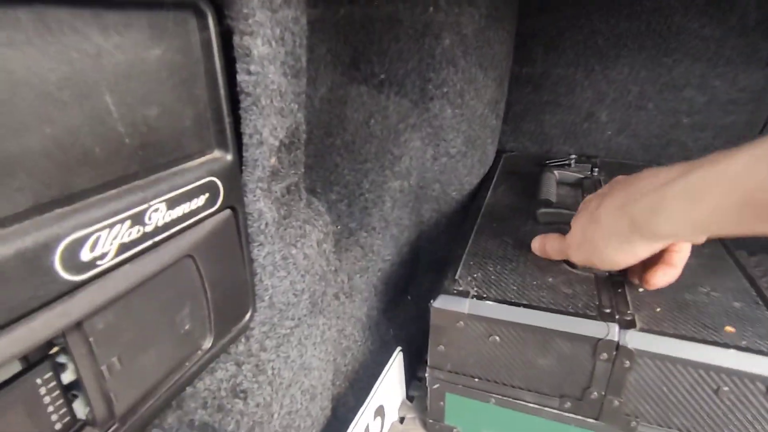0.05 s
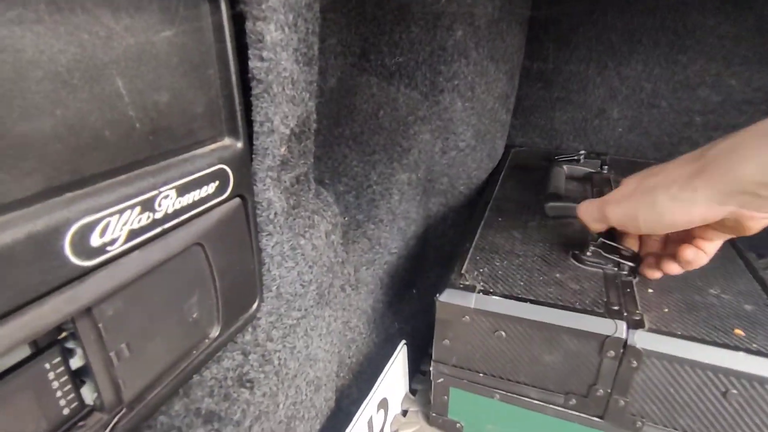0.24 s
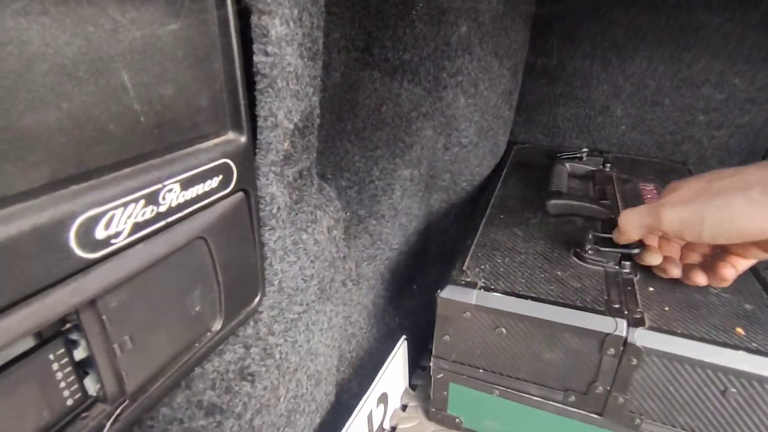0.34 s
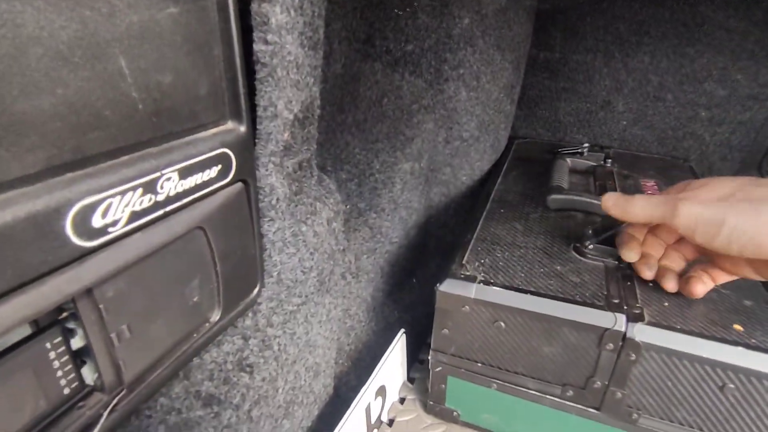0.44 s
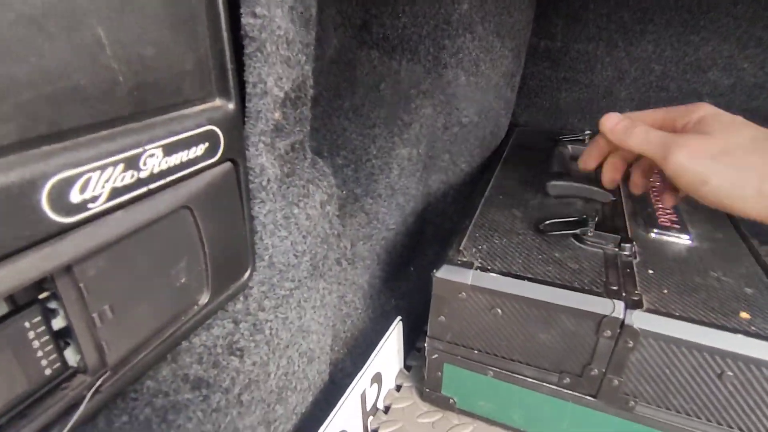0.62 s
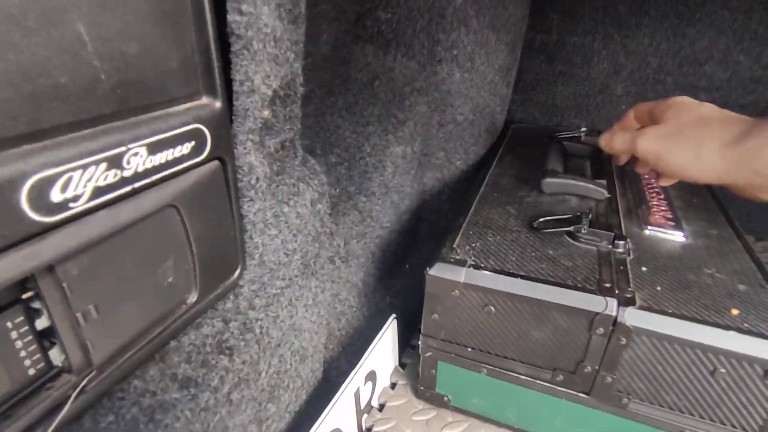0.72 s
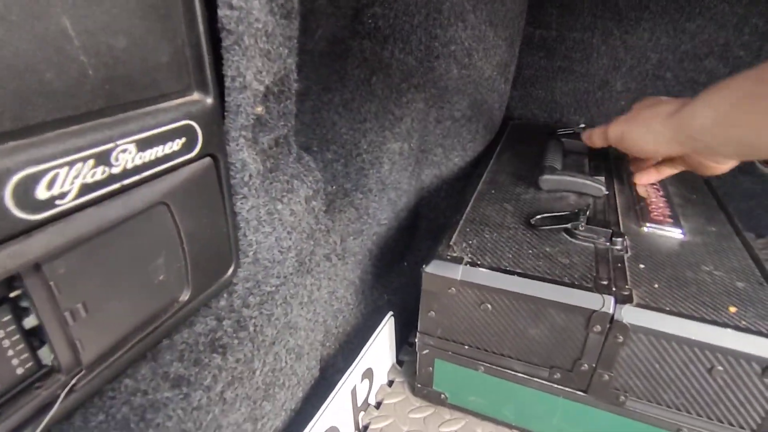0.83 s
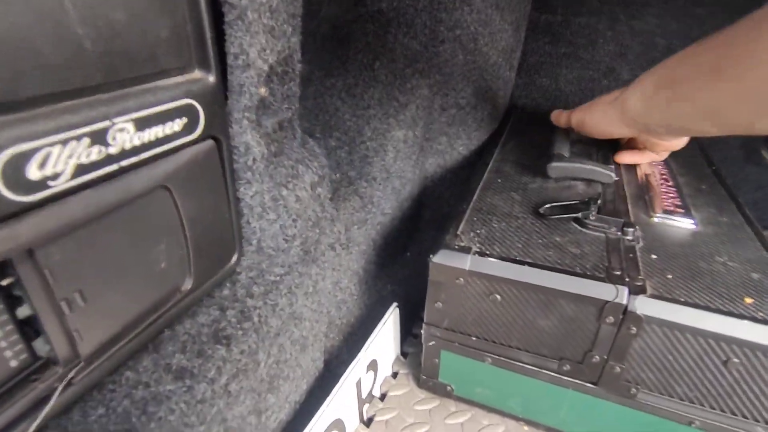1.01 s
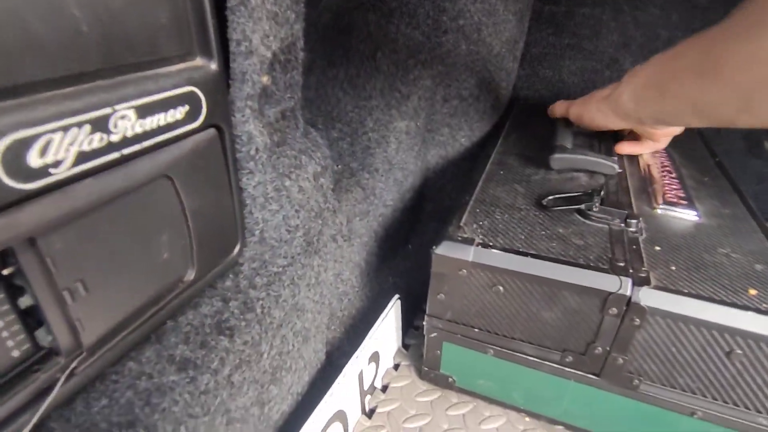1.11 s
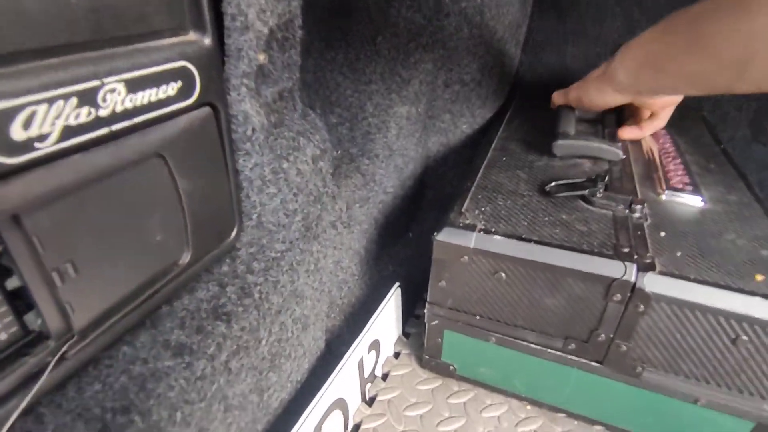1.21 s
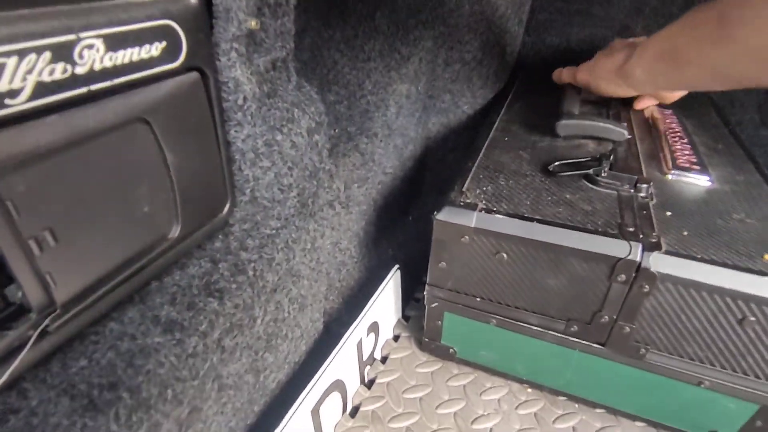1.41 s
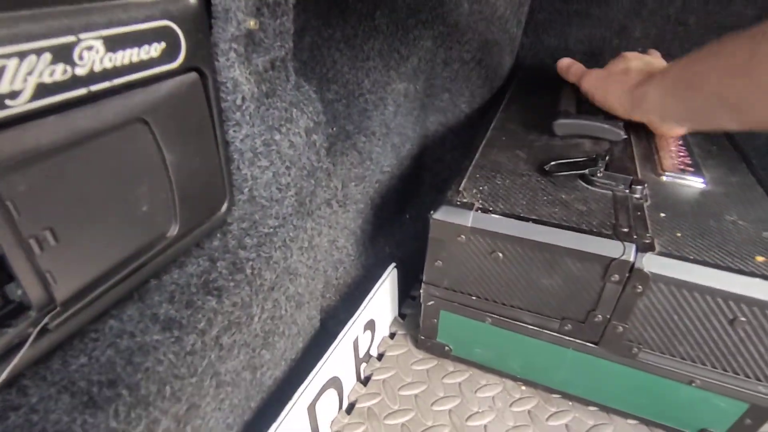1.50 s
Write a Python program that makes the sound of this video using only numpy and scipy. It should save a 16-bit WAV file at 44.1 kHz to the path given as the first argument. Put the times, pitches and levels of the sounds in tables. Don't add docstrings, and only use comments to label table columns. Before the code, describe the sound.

In a small, dry carpeted space, metal case catches clack loudly in quick bursts, knocking the hollow lid; fingers and sleeve brush faintly, a weaker latch click follows, with quiet air and low hum beneath.

```python
import sys
import numpy as np
from scipy import signal
from scipy.fft import rfft, irfft, next_fast_len
from scipy.io import wavfile
from scipy.ndimage import uniform_filter1d, minimum_filter1d, map_coordinates

SR = 44100
rng = np.random.default_rng(int(sys.argv[2]) if len(sys.argv) > 2 else 0)


def bounce(signal):
    frames = np.transpose(np.atleast_2d(signal))
    limited = np.clip(frames, -1, 1)
    pcm = np.round(limited * 32767).astype(np.int16)
    wavfile.write(sys.argv[1], SR, pcm)


def magnitude_from_level(level_db):
    exponent = np.asarray(level_db, float) / 20
    return 10 ** exponent


N = 68355

# frequency in Hz, likeness from -1 to 1.
STEADY_ALIKE = [(60, 0.75), (240, 0.89), (950, 0.17), (3770, -0.25), (15000, 0.3)]
# frequency in Hz, likeness from -1 to 1.
HIT_ALIKE = [(500, 1), (1500, 0.045), (4000, 0.21), (12000, 0.034)]


def unit(x):
    return x / np.sqrt(np.mean(x ** 2) + 1e-20)


def along(points, hz):
    f, v = np.transpose(points)
    return np.interp(np.log(hz + 1), np.log(f + 1), v)


def curves(rows):
    s, *cols = np.transpose(rows)
    return [np.interp(np.arange(N) / SR, s, c) for c in cols]


def wobble(rate):
    knots = rng.standard_normal(int(N * 400 / SR) + 4)
    return map_coordinates(knots, [np.arange(N) * min(rate, 399) / SR])


def filtered(x, response):
    m = next_fast_len(N + SR // 2)
    return irfft(rfft(x, m) * response(np.fft.rfftfreq(m, 1 / SR)), m)[..., :N]


def low_cut(f, cut_hz):
    return -f * f / (cut_hz ** 2 - f * f + 1j * f * cut_hz)


def hiss(spectrum, alike, size, tilt_db=0):
    m = next_fast_len(size)
    hz = np.fft.rfftfreq(m, 1 / SR)
    gain = magnitude_from_level(along(spectrum, hz) + tilt_db * np.log2((hz + 1) / 5000))
    turn = np.arccos(np.clip(along(alike, hz), -1, 1)) / 2
    spread = rfft(rng.standard_normal((2, m))) * gain * [np.cos(turn), np.sin(turn)]
    mid, side = irfft(spread, m)[:, :size]
    z = signal.stft(np.array([mid + side, mid - side]), nperseg=512)[2]
    patches = uniform_filter1d(rng.standard_normal(z.shape[1:]), size=4, axis=0)
    patches = uniform_filter1d(patches, size=6, axis=1)
    patch_db = 4.5 * unit(patches)
    return unit(signal.istft(z * magnitude_from_level(patch_db), nperseg=512)[1][:, :size])


def add(track, sound, s):
    part = track[..., round(s * SR):][..., :sound.shape[-1]]
    part += sound[..., :part.shape[-1]]


def lid():
    # start in seconds, peak in dB, loudest region in octaves over 100 Hz, ring length factor.
    thuds = [(0.013, -27, 1.54, 1.15), (.24, -3.5, 1.72, 1.2), (0.247, 3, 2.2, 0.76),
             (.2505, -1, 3.3, 1.17), (0.2593, -6.5, 0.78, 0.9), (0.282, -18.5, 1.1, 0.82),
             (0.299, -11.5, 1.4, 1.1), (0.32, 6.5, 1.05, 0.54), (0.3253, 3.5, 2.04, 0.13),
             (.3275, 0.5, 3.8, 0.37), (.333, -3.5, 2.16, 1.5), (0.3393, 0.5, 1.84, 0.28),
             (.364, -8, 2.97, 0.68), (0.3676, -0.5, 1.82, 0.36), (0.382, -15, 0.5, .9),
             (0.509, -32, 0.31, .9), (0.504, -31, 2.5, 0.91), (0.5691, -17, 1.06, 0.76),
             (0.5736, -22, 3.32, 0.47), (0.5782, -14.5, 1.56, 0.75), (0.596, -23.5, 1.1, 2.1),
             (0.6372, 8.5, 3.68, 0.36), (.6403, -6, 1.11, 0.87), (0.6402, -5, 1.66, 0.74),
             (0.659, -21, 0.68, 0.46), (0.862, -37, 0.3, 1.2), (1.05, -28, 0.33, 0.18),
             (1.063, -36.5, 3.3, 0.48), (1.0892, -15, 2.05, 0.33), (1.0901, -12.5, 3.4, 0.47),
             (1.0918, -9, 1.58, 0.32), (1.0951, -16, 2.04, 0.29), (1.1036, -12.5, 1.8, 0.32),
             (1.124, -32, 0.6, .5), (1.288, -33, 0.45, 0.22), (1.405, -30, 1.74, 0.41),
             (1.47, -35, 1.76, 0.58), (1.5187, -30, 1.6, 0.28)]
    # frequency in Hz, level in dB, time to fall 60 dB in seconds.
    lid_modes = [(118, -46, 0.077), (147, -3, 0.14), (217, -5, 0.098), (248.3, 5, 0.074),
                 (308.7, -9.5, 0.085), (414, 7, 0.03), (544.5, -3, 0.17), (666, 5, 0.033),
                 (738.5, 1.5, 0.1), (880, -8.5, 0.15), (1089, 4, 0.028), (1420, -5, 0.022),
                 (1906, -11, 0.012)]
    region_octaves, hollow_db, side_db, cut_hz = 0.65, -15.5, -7, 112
    out, t = np.zeros((2, N)), np.arange(SR // 4) / SR
    hz, level, t60 = np.transpose(lid_modes)[:, :, None]
    for s, db, region, life in thuds:
        chance = rng.standard_normal((3, len(lid_modes), 1))
        weight = np.exp(-.5 * ((np.log2(hz / 100) - region) / region_octaves) ** 2)
        weight = weight + magnitude_from_level(hollow_db) / (1 + (hz / 300) ** 4)
        fading = magnitude_from_level(level + chance[0] - 60 * t / (t60 * max(life, .1)))
        modes = weight * fading * np.sin(2 * np.pi * hz * (1 + .012 * chance[1]) * t)
        mid = modes.sum(0)
        side = magnitude_from_level(side_db) * (chance[2] * np.sqrt(hz / 500) * modes).sum(0)
        contact = np.hanning(round(SR / (300 * 2 ** region)) + 3)
        blow = signal.fftconvolve(np.array([mid + side, mid - side]), -contact[None], axes=1)
        add(out, magnitude_from_level(db) * blow / np.abs(blow.mean(0)).max(), s)
    return filtered(out, lambda f: (1j * f / (cut_hz + 1j * f)) ** 2 * low_cut(f, cut_hz) ** 2)


def catches():
    # start in seconds, peak in dB, tilt in dB per octave, time to fall 60 dB in seconds.
    clacks = [(0.064, -41, -5, 0.15), (0.237, -22, -21, 0.054), (0.2403, -1.5, 5, 0.039),
              (0.2436, -15.5, -2, 0.073), (0.248, -9, -1.5, 0.022), (.251, -10, -5.5, 0.044),
              (0.257, -13, 2.5, 0.024), (0.289, -29.5, 2.5, 0.15), (.302, -24, -5.5, 0.034),
              (0.32, -16.5, -6, 0.084), (0.328, -14.5, 2.5, 0.037), (.331, -15, 0.5, 0.053),
              (0.3348, -6, 2, 0.03), (0.354, -21.5, 0.5, 0.13), (0.3651, -7.5, 2.5, 0.038),
              (0.377, -21, -6.5, 0.077), (0.5336, -39.5, 1, 0.04), (0.568, -23, 0, 0.045),
              (.575, -16.5, 2.5, 0.032), (0.597, -30, -0.5, 0.087), (.637, 0.5, -3, 0.024),
              (0.639, -9, 8, 0.02), (0.662, -33.5, 9, 0.047), (1.088, -18, -3, 0.024),
              (1.095, -27.5, 2.5, 0.031), (1.104, -33.5, 1, 0.025), (1.5153, -33, -1.5, 0.014)]
    # frequency in Hz, level in dB, time to fall 60 dB in seconds.
    steel_modes = [(2347, 8.5, 0.023), (4300, 10, 0.047), (6550, 10, 0.11), (8400, 7, 0.026),
                   (9800, -23.5, 0.053), (12700, 2.5, 0.09), (13700, -7.5, .03)]
    # frequency in Hz, level in dB per Hz.
    crack_colour = [(500, -33), (900, -3), (2500, -10), (7300, -17), (12200, -14), (15500, -24.5),
                    (16300, -43.5)]
    ring_db, scatter_db, rattle_db, rise_s = -14, 3, 4, 0.0012
    out, t = np.zeros((2, N)), np.arange(SR // 6) / SR
    hz, level, t60 = np.transpose(steel_modes)[:, :, None]
    for s, db, tilt_db, life in clacks:
        size_db = level + tilt_db * np.log2(hz / 5000)
        chance = rng.standard_normal((3, len(steel_modes), 1))
        phase = rng.uniform(0, 2 * np.pi, (2, len(steel_modes), 1))
        fading_db = size_db - size_db.max() + scatter_db * chance[:2] - 60 * t / np.minimum(t60, life)
        notes = np.sin(2 * np.pi * hz * (1 + 0.036 * chance[2]) * t + phase)
        ring = (magnitude_from_level(fading_db) * notes).sum(1)
        rattle = magnitude_from_level(rattle_db * unit(uniform_filter1d(rng.standard_normal(len(t)), size=40)))
        crack = unit(rattle * hiss(crack_colour, HIT_ALIKE, len(t), tilt_db))
        crack = crack * magnitude_from_level(-60 * t / max(life, .004))
        rise = 1 - np.exp(-t / rise_s)
        add(out, magnitude_from_level(db - 1) * rise * (crack + magnitude_from_level(ring_db) * ring), s)
    return out


def ticks():
    # start in seconds, peak in dB, frequency in Hz, time to fall 60 dB in seconds.
    loose_parts = [(0.069, -49, 1380, .04), (.2408, -24, 4300, 0.023), (0.2496, -9, 4280, 0.026),
                   (.252, -12, 5860, 0.026), (.326, -34, 2470, 0.016), (.329, -9, 1800, 0.017),
                   (.364, -15, 5670, 0.024), (.5345, -59, 11000, 0.023), (.503, -37, 647, 0.058),
                   (.573, -12.5, 709, 0.03), (0.578, -34, 13500, 0.013), (.6372, -9, 730, 0.062),
                   (0.6352, -14, 1156, 0.044), (0.6371, -13.5, 2430, 0.022), (.6455, -43, 6500, 0.014),
                   (.648, -19.5, 3930, 0.026), (1.089, -39, 2336, 0.036), (1.09, -29.5, 4090, 0.022),
                   (1.095, -23.5, 1510, 0.012), (1.0962, -25.5, 5710, 0.017), (1.097, -39, 3670, 0.038),
                   (.015, -35, 950, 0.015), (1.468, -48.5, 2350, 0.016), (1.516, -41.5, 3950, 0.018),
                   (1.5165, -53, 2260, 0.016), (1.515, -41, 1420, 0.035)]
    rise_s, roughness = 0.0004, 0.8
    out, t = np.zeros((2, N)), np.arange(SR // 12) / SR
    for s, db, hz, life in loose_parts:
        wander = roughness * np.cumsum(rng.standard_normal(len(t))) / np.sqrt(SR / 1000)
        apart = rng.uniform(-1.3, 1) * np.array([[1], [-1]])
        note = np.sin(2 * np.pi * hz * t + wander + apart)
        add(out, magnitude_from_level(db - 60 * t / max(life, .004)) * (1 - np.exp(-t / rise_s)) * note, s)
    return out


def boot(x):
    # frequency in Hz, time to fall 60 dB in seconds.
    tail_length = [(150, 0.1), (500, .085), (1500, 0.075), (5000, 0.065), (14000, 0.06)]
    burst = hiss([(20, 0.006), (20000, 0.011)], HIT_ALIKE, SR // 4)
    hz, t, z = signal.stft(burst, SR, nperseg=256)
    tail = signal.istft(z * magnitude_from_level(-60 * t / along(tail_length, hz)[:, None]), SR, nperseg=256)[1]
    late = np.pad(x, ((0, 0), (90, 0)))
    return signal.fftconvolve(late, tail / np.linalg.norm(tail[0]), axes=1)[:, :N]


def fingers():
    # start in seconds, length in seconds, hiss in dB, fade in seconds.
    drags = [
        (-.05, 0.25, -54.5, 0.092),
        (0.168, 0.039, -53, 0.012),
        (0.373, 0.15, -64.5, 0.011),
        (0.963, 0.13, -56, 0.022),
        (1.107, 0.36, -67.5, 0.012),
        (1.276, 0.16, -50, 0.04),
        (1.527, .08, -57.5, 0.0033),
    ]
    # time in seconds, level in dB.
    pressure = [(0, 2.5), (.22, 10.5), (.45, 11.5), (.56, 6.5), (.7, -4.5), (.95, 0.5), (1.06, 4),
                (1.2, 2.5), (1.4, 5.5), (1.55, -4)]
    # frequency in Hz, level in dB per Hz.
    skin_colour = [(800, -34), (1500, -19), (3200, -0.5), (6500, -6), (9000, -0.5), (12600, 0.5),
                   (15500, -15), (15900, -50)]
    # frequency in Hz, level in dB per Hz.
    rumble_colour = [(70, -31.5), (105, -6.5), (145, -18.5), (220, -5.5), (590, -9), (890, -17.5),
                     (4000, -32), (6000, -37)]
    rumble_db = -53.5
    t = np.arange(N) / SR
    strokes = np.zeros(N)
    for s, length, db, fade in drags:
        strokes += magnitude_from_level(db) * np.clip(np.minimum(t - s, s + length - t) / fade, 0, 1) ** 2
    grain = magnitude_from_level(1.3 * wobble(280) + 1.8 * wobble(42.1))
    skin = unit(grain * hiss(skin_colour, [(1000, 0.061)], N))
    lumps = magnitude_from_level(2.1 * wobble(44.08) + 2.4 * wobble(160))
    body = unit(lumps * hiss(rumble_colour, STEADY_ALIKE, N))
    return strokes * skin + magnitude_from_level(rumble_db + curves(pressure)[0]) * body


def sleeve():
    # time in seconds, centre frequency in Hz, level in dB.
    swishes = [
        [(.73, 4300, -85), (.748, 4900, -59), (.775, 5800, -63), (.8, 6000, -69)],
        [(.78, 4300, -80), (.803, 4900, -55), (.815, 4600, -62), (.87, 2900, -68)],
    ]
    out = np.zeros((2, N))
    t = np.arange(N) / SR
    for rows in swishes:
        hz, db = curves(rows)
        inside = (t > rows[0][0]) & (t < rows[-1][0])
        whistle = np.sin(2 * np.pi * np.cumsum(hz * (1 + .05 * wobble(200))) / SR)
        out += inside * magnitude_from_level(db) * np.array([wobble(390), wobble(390)]) * whistle
    return out


def hum():
    hum_hz, drift, level_db, waver_db = 68, 0.0046, -49, -1
    tone = np.sin(2 * np.pi * np.cumsum(hum_hz * (1 + drift * wobble(6.3))) / SR)
    tone = tone * magnitude_from_level(waver_db * wobble(7.3))
    return np.sqrt(2) * magnitude_from_level(level_db) * tone * magnitude_from_level([[-.4], [.4]])


def quiet_air():
    # frequency in Hz, level in dB per Hz.
    air_colour = [(30, 1), (80, -13), (130, 7), (420, -8.5), (4600, -20), (7100, -29), (12000, -27.5),
                  (15600, -40.5), (15900, -99.5)]
    return magnitude_from_level(-54) * hiss(air_colour, STEADY_ALIKE, N)


def scene():
    # frequency in Hz, left over right in dB.
    lean = [(1000, 0), (4000, 1), (8000, -4), (13000, 13)]
    boot_db, top_hz = -7, 16050
    hits = lid() + catches() + ticks()
    near = hits + magnitude_from_level(boot_db) * boot(hits) + fingers()
    near = filtered(near, lambda f: magnitude_from_level(along(lean, f) * [[.5], [-.5]]) / (1 + (f / top_hz) ** 60))
    return near + sleeve() + hum() + quiet_air()


def top_cut(x):
    return signal.sosfilt(signal.butter(12, 17140, fs=SR, output="sos"), x)


def record(dry):
    knee_db, slope, hold_s = -24, 0.38, 0.045
    bottom_hz, edge_hz, edge_db = 42, 15850, -20
    span = max(round(hold_s * SR), 2)
    level_db = 10 * np.log10(np.abs(uniform_filter1d((dry ** 2).mean(0), size=330)) + 1e-12)
    cut_db = -slope * np.maximum(level_db - knee_db, 0)
    cut_db = minimum_filter1d(cut_db, span, origin=(span - 1) // 2)
    cut_db = uniform_filter1d(cut_db, size=520)
    heard = filtered(dry * magnitude_from_level(cut_db), lambda f: low_cut(f, bottom_hz) ** 2 * magnitude_from_level(edge_db * (f > edge_hz)))
    return top_cut(heard)


dry = scene()
out = record(dry)
bounce(out)
```